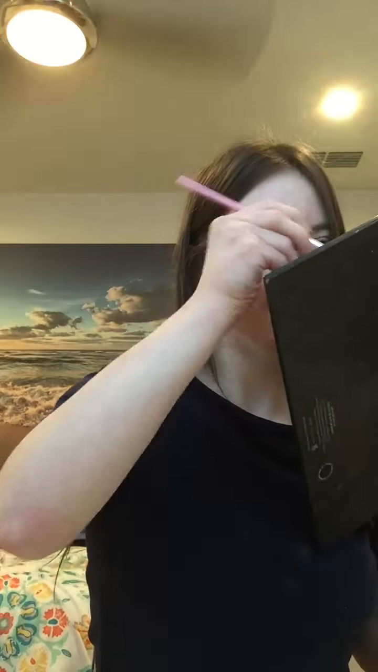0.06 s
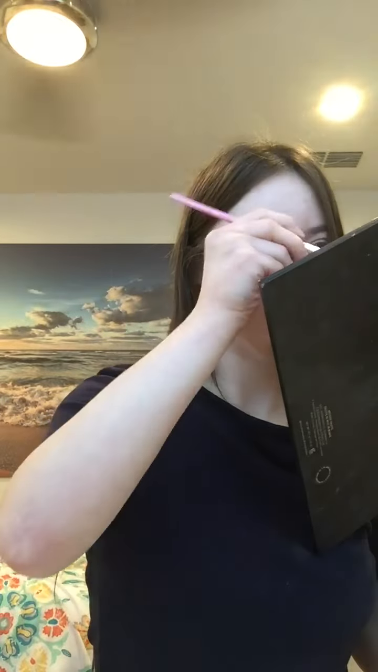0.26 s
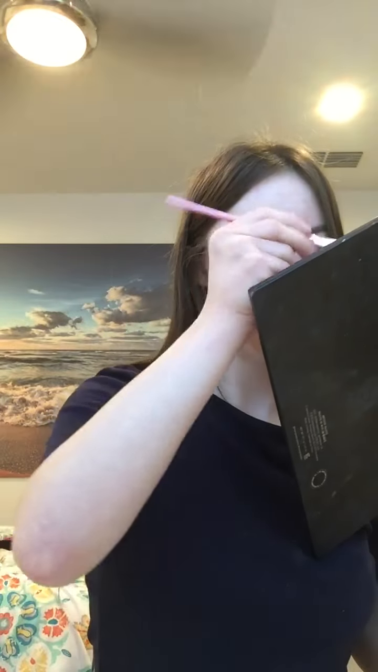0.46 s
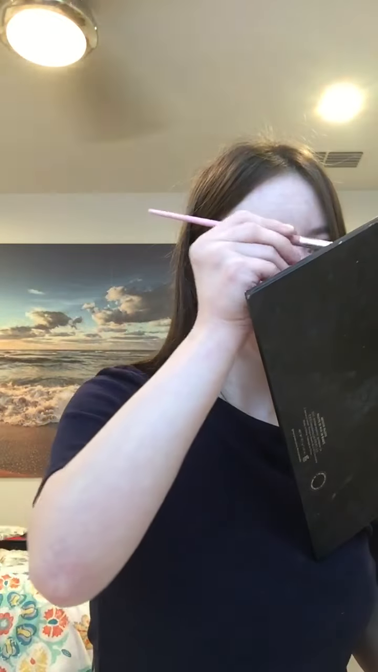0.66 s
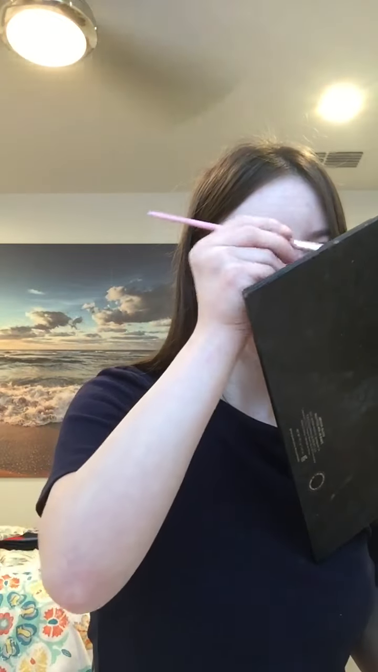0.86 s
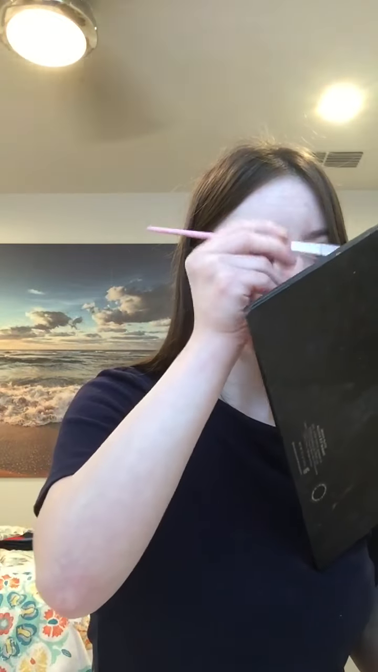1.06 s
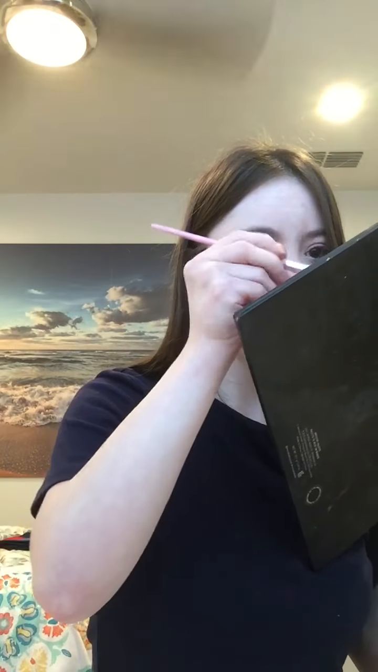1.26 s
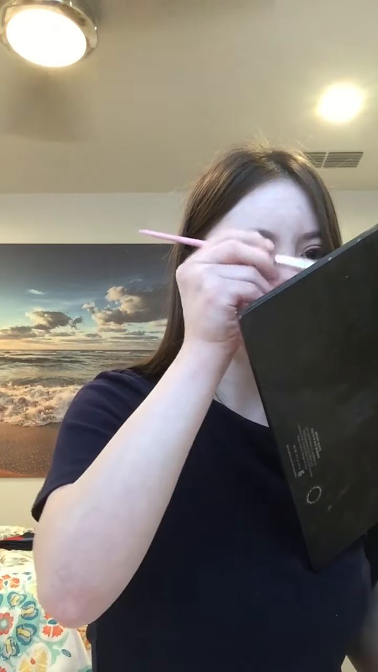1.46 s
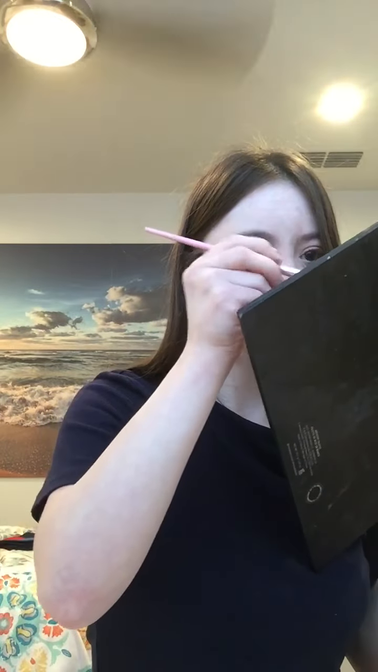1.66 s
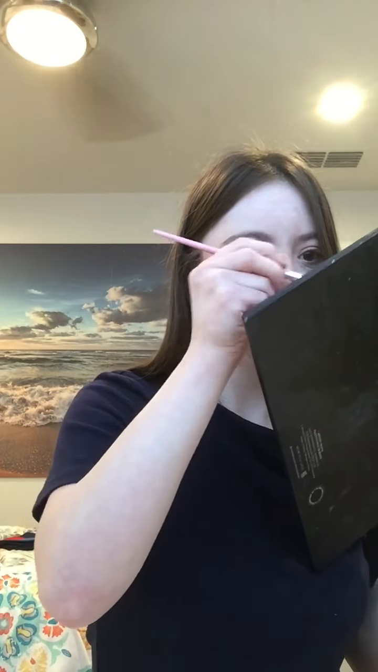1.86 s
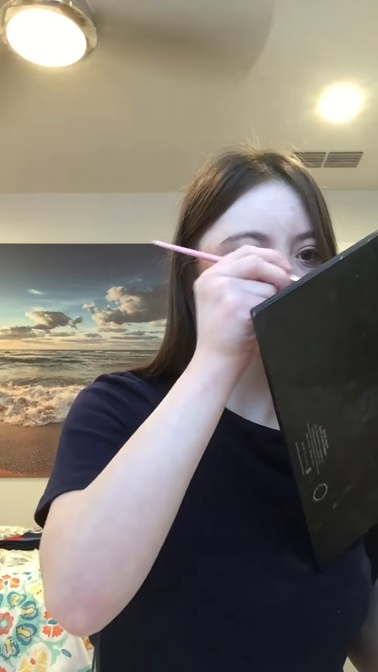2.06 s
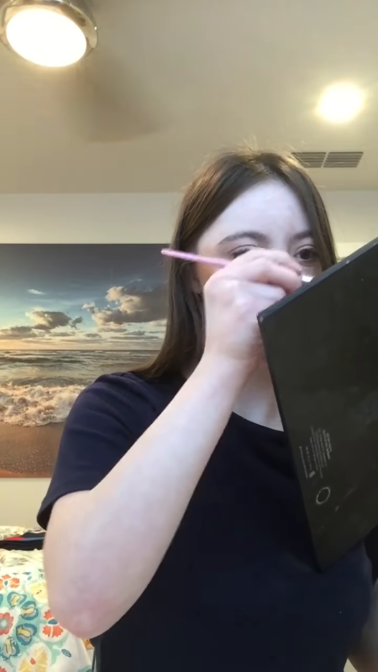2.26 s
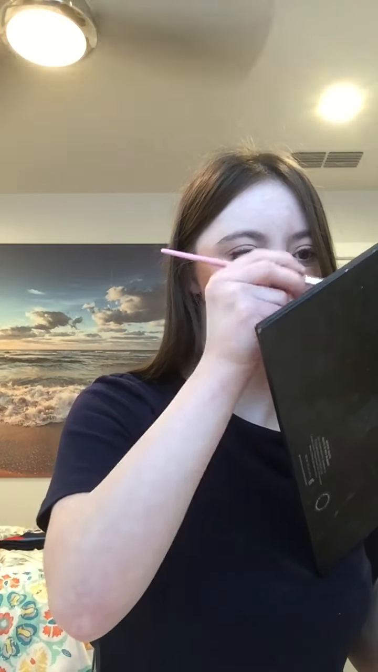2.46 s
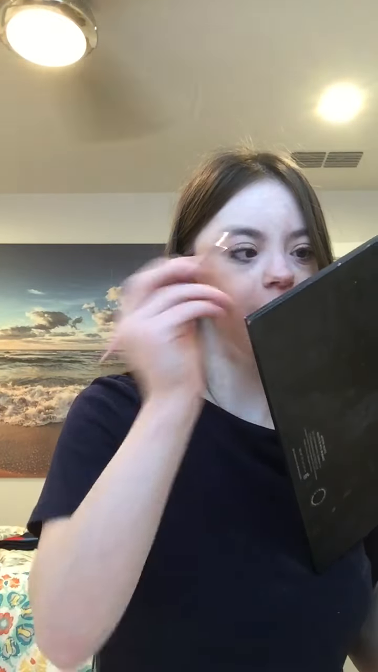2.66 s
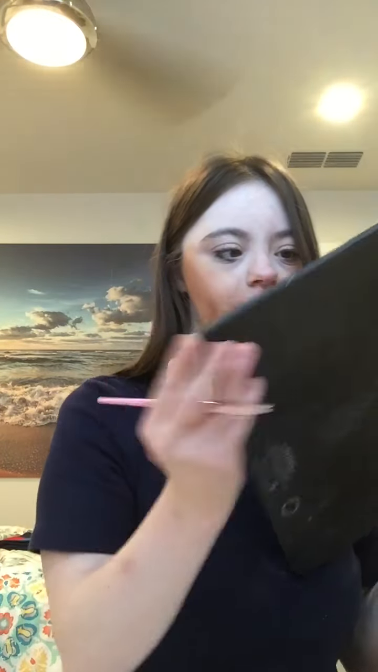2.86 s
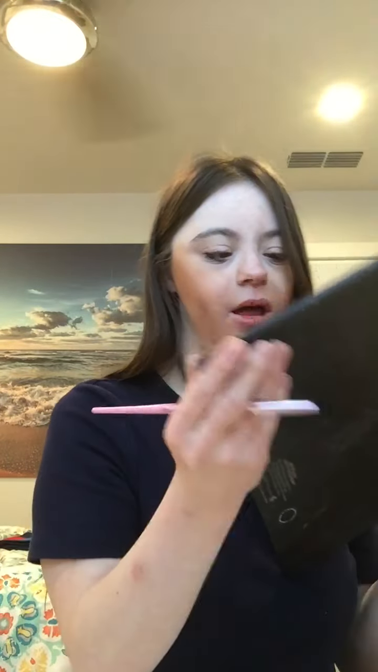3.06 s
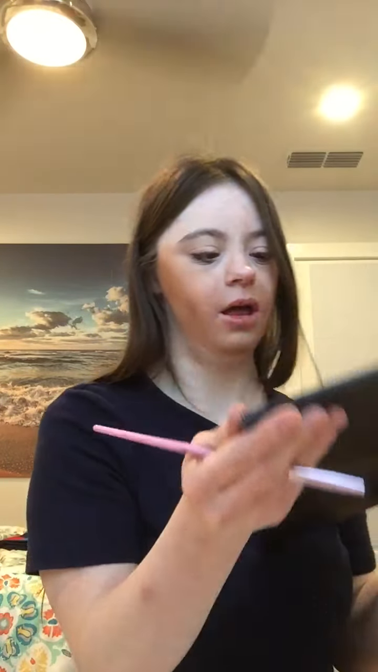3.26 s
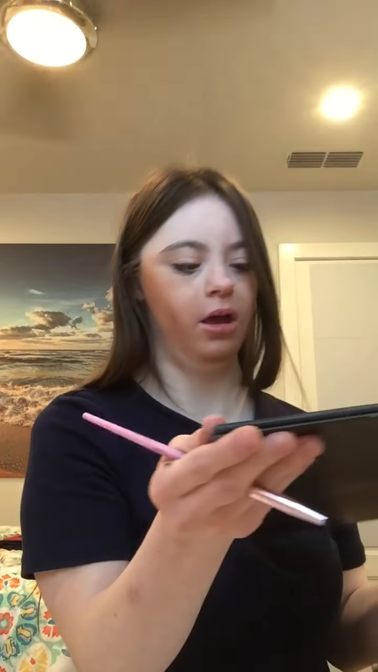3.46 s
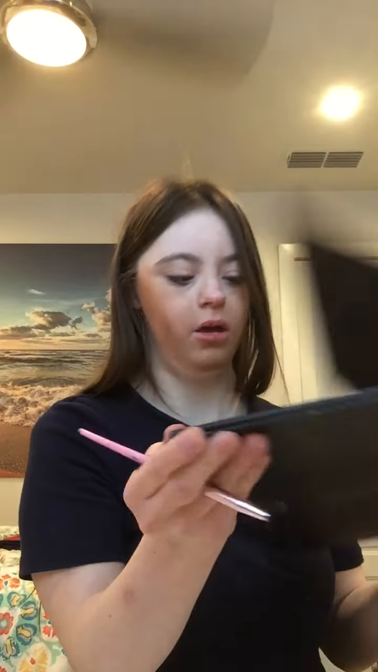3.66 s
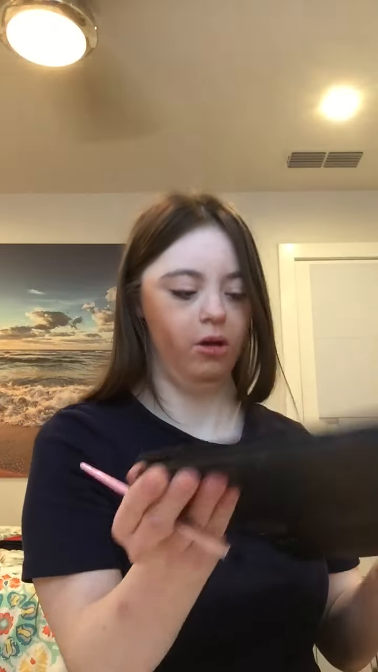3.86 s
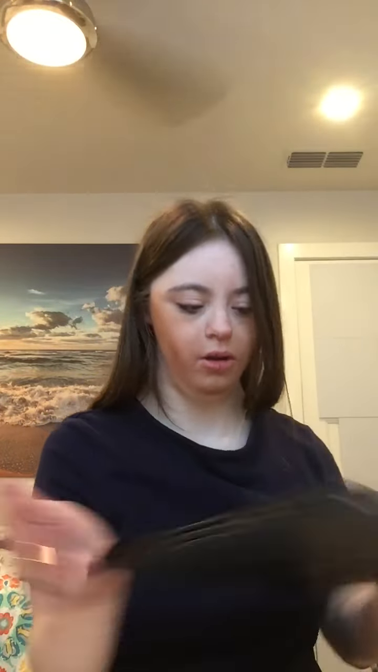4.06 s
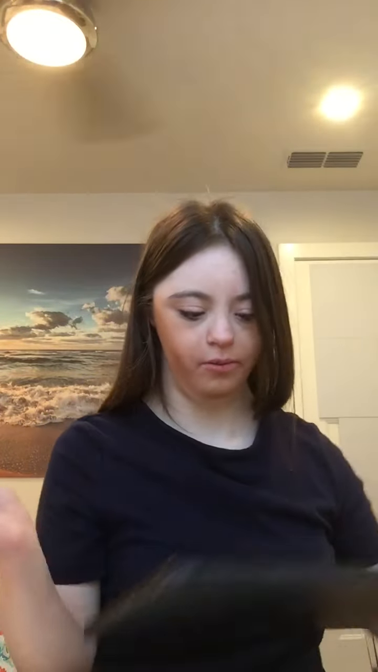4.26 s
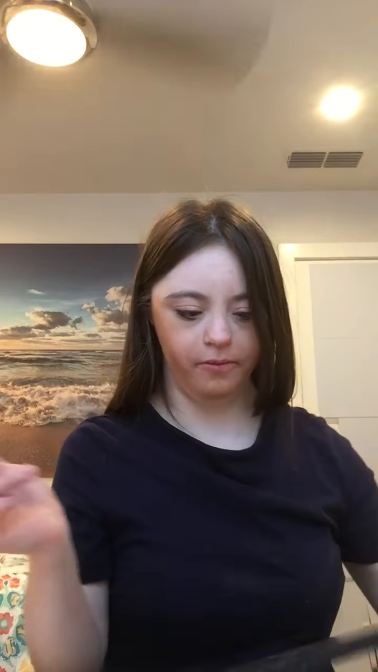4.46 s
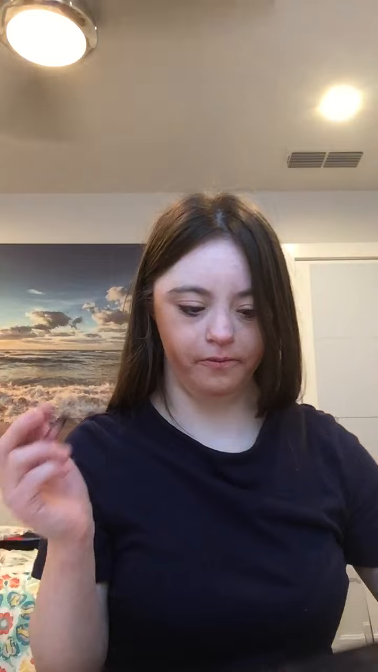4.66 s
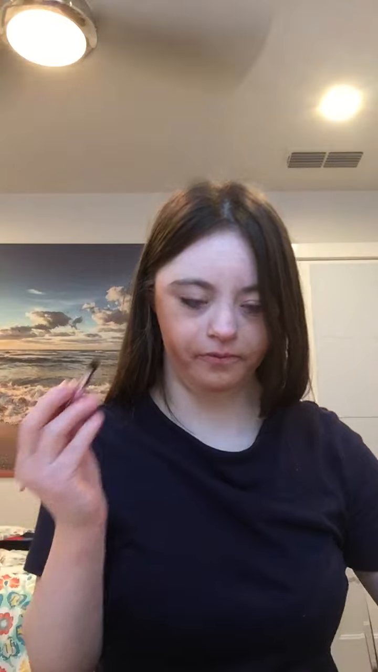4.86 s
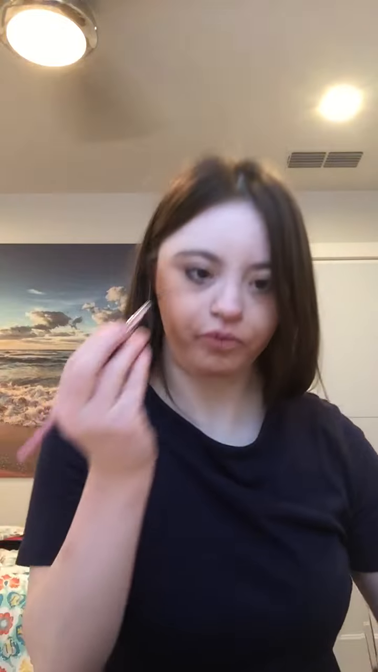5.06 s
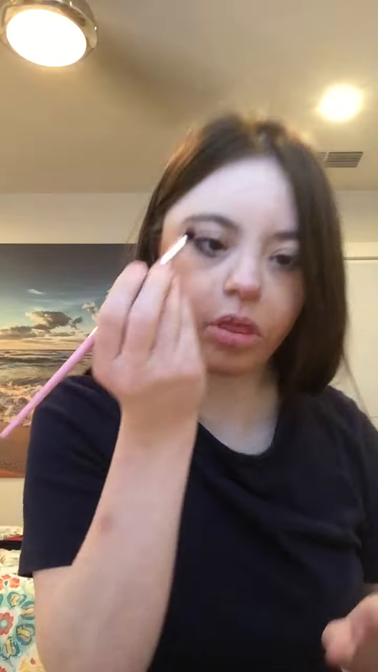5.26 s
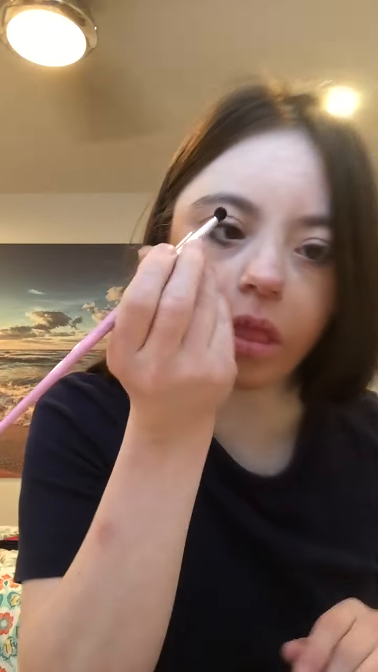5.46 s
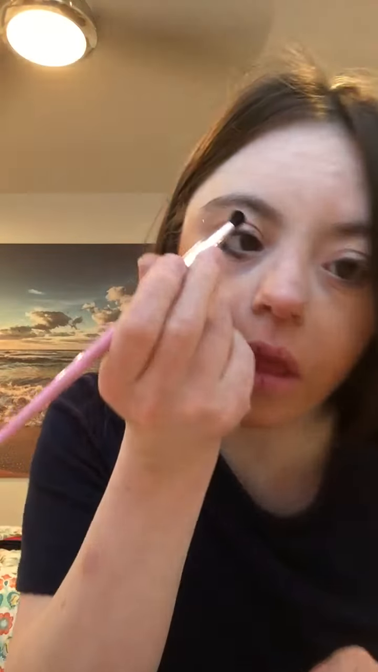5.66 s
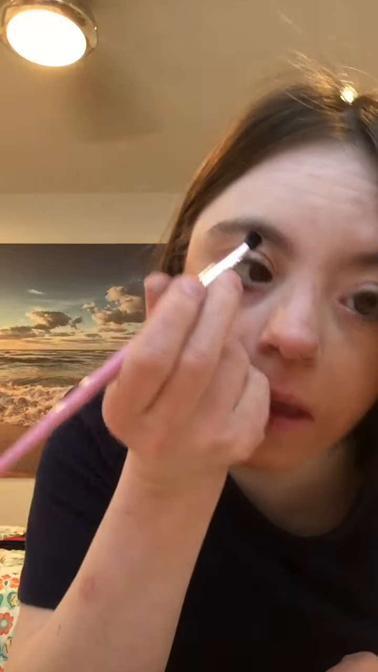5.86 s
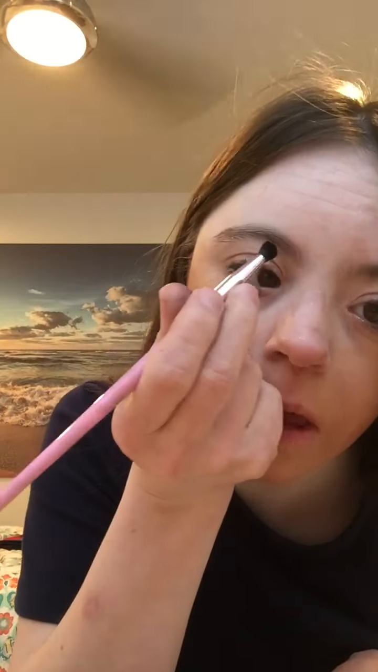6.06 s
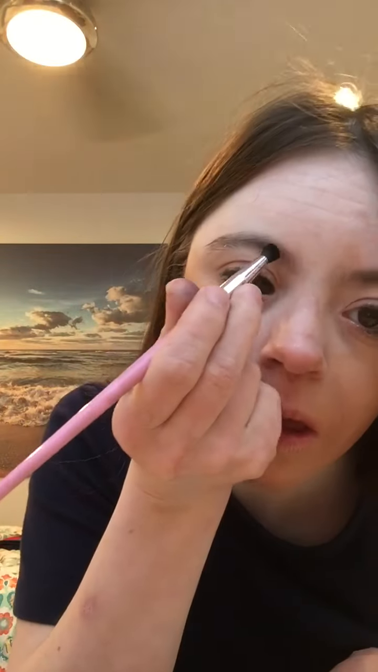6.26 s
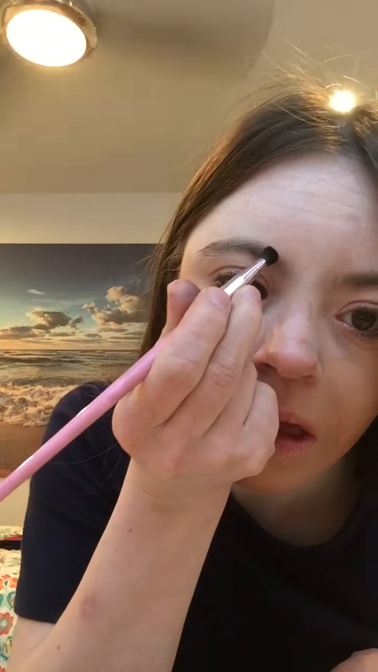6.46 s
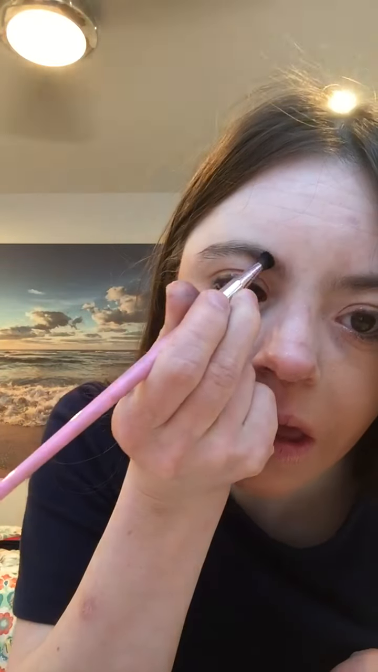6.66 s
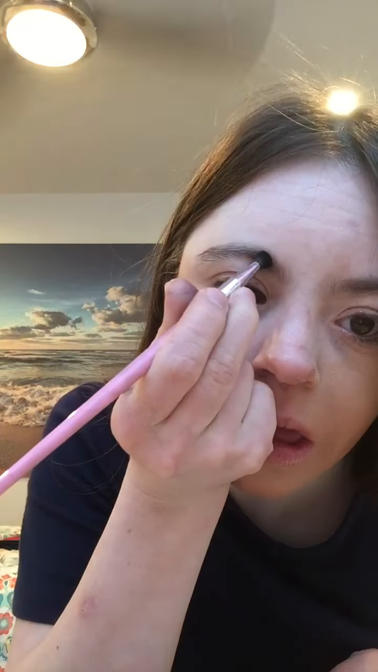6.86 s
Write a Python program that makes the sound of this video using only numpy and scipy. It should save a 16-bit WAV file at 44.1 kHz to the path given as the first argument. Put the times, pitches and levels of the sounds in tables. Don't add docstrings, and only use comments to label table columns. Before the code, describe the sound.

Two sharp plastic lid snaps, then heavy boomy knocks of a case landing on a desk beside the microphone, over faint low hum.

```python
import sys
import numpy as np
from scipy import signal
from scipy.fft import rfft, irfft
from scipy.io import wavfile
from scipy.ndimage import uniform_filter1d

SR = 44100
rng = np.random.default_rng(int(sys.argv[2]) if len(sys.argv) > 2 else 0)


def ratio(d):
    e = np.asarray(d, float) / 20
    return 10 ** e


def pcm_store(signal):
    levels = np.round(np.clip(np.atleast_2d(signal), -1, 1) * 32767)
    wavfile.write(sys.argv[1], SR, levels.astype(np.int16).T)


N = 304376
T = np.arange(N) / SR


def level(x, db):
    return x * ratio(db) / np.sqrt(np.mean(x ** 2))


def high(x, hz):
    return signal.sosfilt(signal.butter(4, hz, "high", fs=SR, output="sos"), x)


def walk(rate_hz):
    k = int(SR / rate_hz)
    x = uniform_filter1d(uniform_filter1d(rng.standard_normal(N), k), k)
    return x / x.std()


def add(out, s, x):
    i = int(s * SR)
    out[i:i + len(x)] += x[:len(out) - i]


def ring(x, modes):
    out = 0
    for k, (hz, width_hz, db) in enumerate(modes):
        out = out + (-1) ** k * ratio(db) * signal.lfilter(*signal.iirpeak(hz, hz / width_hz, fs=SR), x)
    return out


def struck(x, modes):
    out = 0
    for hz, width_hz, db in modes:
        wide_hz = 1.51 * width_hz
        out = out + ring(ring(x, [(hz, wide_hz, db)]), [(hz, wide_hz, 0)])
    return out


def hits(events, modes, crack_hz, lead_db, room_db, wetter=0, blur=1.42):
    lead_ms = 8.1
    dry, send, t = np.zeros(N), np.zeros(N), T[:4096] - .02
    loudest_db = np.max(np.transpose(events)[1])
    noises = rng.standard_normal((len(events), len(t)))
    for (s, db, crack_db, ms, tilt_db), noise in zip(events, noises):
        tilted = np.array([(hz, width_hz, mode_db + tilt_db * np.log2(hz / 1000))
                           for hz, width_hz, mode_db in modes])
        swell = ratio(lead_db) * np.exp(1000 * t / lead_ms)
        shape = np.where(t < 0, swell, np.exp(-1000 * t / max(ms, .2)))
        spectrum = rfft(noise * shape)
        rattle = irfft(spectrum / np.abs(spectrum)) * shape ** 0.29
        click = 1. * (np.arange(len(t)) == np.argmax(shape))
        heard = []
        for contact, wide in ((rattle, 1), (click, blur)):
            body = struck(contact, tilted * [1, wide, 1])
            crack = high(contact, crack_hz)
            heard.append(body / np.linalg.norm(body) + ratio(crack_db) * crack / np.linalg.norm(crack))
        gain = ratio(db) / np.abs(heard[0]).max()
        add(dry, s + t[0], gain * heard[0])
        add(send, s + t[0], gain * ratio(room_db + wetter * (loudest_db - db)) * heard[1])
    return np.array([dry, send])


def rubbed(modes, grit_db, patchy_db):
    size = ratio(grit_db * rng.exponential(size=N) + 0.95 * walk(120))
    grains = sum(ring(size * rng.standard_normal(N), [mode]) * ratio(patchy_db * walk(45)) for mode in modes)
    return level(grains, 0)


def played(sound, strokes, peaks_db):
    power = 0
    for (s, rise_ms, fall_ms, *_), peak_db in zip(strokes, peaks_db):
        away = np.where(T < s, (s - T) / max(rise_ms, 1), (T - s) / max(fall_ms, 1))
        power = power + ratio(2 * peak_db - 21000.0 * away)
    return sound * np.sqrt(power)


# band in Hz, T60 in s.
ROOM_T60 = [(100, 0.34), (1000, 0.29), (4000, 0.18), (12000, 0.19)]


def room():
    wall_ms, wall_db = 19, -10.5
    t = T[:SR // 2]
    hz, t60_s = np.transpose(ROOM_T60)
    tail = 0
    for f in 90 * 2 ** np.arange(0, 7.6, .5):
        band = ring(rng.standard_normal(len(t)), [(f, f / 1.32, 0)])
        tail = tail + band * ratio(-60 * t / np.interp(np.log(f), np.log(hz), t60_s))
    late = np.clip(t - wall_ms / 1000, 0, None)
    wall = ratio(wall_db) * (late > 0) * np.exp(-late / 0.0068)
    tail = tail * (np.clip(t / 0.0079, 0, 1) + wall)
    return tail / np.sqrt(np.sum(tail ** 2))


# frequency in Hz, rms level in dB.
HUM = [(120, -48), (240, -60.5), (360, -60)]
# frequency in Hz, density in dB per Hz.
AIR = [(15, -67), (25, -23.5), (65, -13), (92, -9), (124, -10), (146, -10.5), (167, -10.5), (232, -9),
       (296, -14.5), (358, -12.5), (510, -31), (634, -31), (13300, -52), (15200, -49), (16500, -66)]


def fan():
    air_db = -54
    hum = 0
    for (hz, db), waver_db in zip(HUM, (.9, 2.5, 2.5)):
        phase = 2 * np.pi * hz * T + 0.24 * walk(5.9) + rng.uniform(0, 2 * np.pi)
        hum = hum + np.sqrt(2) * ratio(db + waver_db * walk(6.3)) * np.sin(phase)
    hz, db = np.transpose(AIR)
    f = np.maximum(np.fft.rfftfreq(N, 1 / SR), 1)
    density = ratio(np.interp(np.log(f), np.log(hz), db))
    air = irfft(rfft(rng.standard_normal(N)) * density, N)
    return hum + level(air * ratio(0.29 * walk(1)), air_db)


# peak in seconds, rise and fall in ms per 10 dB, level in dB.
SLEEVE = [
    (5.36, 65, 30, -67),
    (5.37, 7, 6, -56),
    (5.52, 12, 60, -66),
    (5.575, 104, 47, -57.5),
]


def sleeve():
    cloth = rubbed([(685, 170, 2.5), (1400, 450, -5.0)], grit_db=2.5, patchy_db=3.5)
    return played(cloth, SLEEVE, np.transpose(SLEEVE)[-1])


# peak in seconds, rise and fall in ms per 10 dB, level in dB.
CREAK = [
    (3.035, 22, 68, -56),
    (3.092, 12, 11, -53.5),
    (3.165, 90, 27, -60),
]


def hinge():
    creak = rubbed([(2030, 130, 1), (2210, 120, 0)], grit_db=2.5, patchy_db=5.0)
    return played(creak, CREAK, np.transpose(CREAK)[-1])


# peak in seconds, rise and fall in ms per 10 dB, dry skin in dB, dull scrape in dB.
RUBS = [(1.07, 60, 80, -74, -73.5), (1.165, 10, 30, -74, -73), (1.605, 42, 40, -75, -76),
        (2.064, 8, 22, -76, -57), (2.112, 5, 50, -70, -70), (2.786, 18, 127, -58.5, -59.5),
        (2.94, 60, 30, -63, -66), (3.011, 30, 45, -54.5, -61), (3.097, 19, 32, -56, -61),
        (3.177, 60, 45, -65.5, -68), (3.329, 21, 22, -65, -77), (3.383, 35, 77, -66, -67),
        (3.64, 48, 150, -58.5, -64), (3.73, 130, 40, -55, -72), (3.96, 22, 97, -62.5, -57.5),
        (4.062, 25, 32, -58.5, -65), (4.152, 54, 41, -56.5, -66), (4.71, 35, 40, -67, -51.5),
        (4.78, 45, 150, -64.5, -60.5), (4.846, 25, 11, -62, -54), (4.9, 40, 150, -88, -69),
        (4.986, 8, 60, -70, -56), (5.02, 57, 45, -66, -61), (5.565, 52, 45, -68, -60.5)]
# centre in Hz, width in Hz, level in dB.
SKIN = [(6500, 4500, -11.5), (9060, 1500, -5.5), (12400, 1800, -1), (14800, 2400, -0.5)]
# centre in Hz, width in Hz, level in dB.
SCRAPE = [(910, 1100, 2), (1940, 1050, -0.5), (3170, 800, -6.5), (4100, 1100, 2.5), (5130, 690, 0.5)]


def fingers():
    skin = rubbed(SKIN, grit_db=2.2, patchy_db=2.6)
    scrape = rubbed(SCRAPE, grit_db=2.2, patchy_db=2.8)
    *_, skin_db, scrape_db = np.transpose(RUBS)
    return played(skin, RUBS, skin_db) + played(scrape, RUBS, scrape_db)


# start in seconds, peak in dB, mode in Hz, contact in ms.
PINGS = [
    (2.939, -45, 1400, 1.3),
    (3.776, -51, 4260, 6.5),
    (4.9133, -49, 3050, 1.5),
    (5.047, -47, 3430, 1.8),
    (5.37, -48, 1400, 1.6),
    (5.66, -53.5, 8300, 2.9),
    (5.986, -54.5, 7100, 2.4),
]


def pings():
    width_share = 0.13
    return sum(hits([(s, db, -60, ms, 0)], [(hz, width_share * hz, 0)], crack_hz=8000, lead_db=-29, room_db=-19)
               for s, db, hz, ms in PINGS)


# start in seconds, peak in dB, treble crack in dB, contact in ms, tilt in dB per octave.
TICKS = [(2.058, -51, -23, 3.7, -5), (2.075, -53, -14, 3.2, 3), (2.10, -65, 0, 2.2, .3),
         (2.776, -47, -15, 1.7, -11), (4.056, -58, -10, 1.9, .3), (4.706, -48, -20, 5.1, -7),
         (4.986, -47, -32, 3.7, -11), (5.01, -56, -25, 3.4, -6), (5.047, -46, -30, 2.6, -10),
         (5.499, -62, 5, 1.5, .3), (5.647, -53, 8, 1.5, .3), (5.72, -57, 5, 1.5, .3),
         (6.0, -56, 7, 2.2, .3)]
# frequency in Hz, width in Hz, level in dB.
BRUSH = [(2380, 790, -12), (3520, 920, -1), (5600, 680, -6), (7100, 2900, -13)]


def ticks():
    return hits(TICKS, BRUSH, crack_hz=7600.3, lead_db=-4, room_db=-6)


# start in seconds, peak in dB, treble crack in dB, contact in ms, tilt in dB per octave.
TAP = [
    (6.228, -32, -11.5, 1.3, .3),
    (6.251, -39.5, -14.5, 6.3, .3),
]
# frequency in Hz, width in Hz, level in dB.
HANDLE = [(1030, 200, -20), (1490, 410, 6.5), (1915, 47, 6), (3050, 400, -36), (3950, 370, 1.5),
          (5950, 470, -9.5)]


def handle_tap():
    return hits(TAP, HANDLE, crack_hz=7000, lead_db=-19, room_db=-4, blur=1)


def desk(blows, choke, sag_per_db):
    sag_from_db, least_sag = -41, 0.25
    deep_hz, deep_ms = 69.7, 21.7
    out, t = np.zeros(N), T[:8192]
    for s, db, hz, ms, deep_db in blows:
        sag = max(least_sag, sag_per_db * (db - sag_from_db))
        phase = 2 * np.pi * hz * (t + sag * 0.0024 * (1 - np.exp(-t / 0.0018)))
        top = np.sin(phase) * (1 - np.exp(-t / 0.00094)) * np.exp(-(1000 * t / ms) ** choke)
        deep_shape = (1 - np.exp(-t / 0.0048)) * np.exp(-1000 * t / deep_ms)
        deep = ratio(deep_db) * np.sin(2 * np.pi * deep_hz * t) * deep_shape
        add(out, s, ratio(db) * (top - deep))
    return out


# start in seconds, peak in dB, ring in Hz, lasts in ms, deep mode in dB.
SLAPS = [
    (5.034, -26.5, 96, 14, 3),
    (5.0908, -3.5, 117, 15.4, -19),
]


def slaps():
    slap = -desk(SLAPS, choke=3.4, sag_per_db=0)
    return np.array([slap, ratio(-21.0) * slap])


# start in seconds, peak in dB, ring in Hz, lasts in ms, deep mode in dB.
BOOMS = [
    (2.9285, -39.5, 152, 9.8, -11),
    (2.9385, -32.5, 229, 22, -2),
    (3.7845, -30, 109, 17, -32),
    (3.7905, -24, 210, 6.4, -14),
    (4.4233, -6.5, 126, 11.9, -10),
    (4.5190, -17, 131, 9.5, -9),
    (4.6620, -7, 108, 12.8, -13),
    (4.6896, -13, 98, 7.5, -38.5),
    (4.849, -28.5, 138, 7.8, -9),
    (5.369, -36.5, 140, 9.3, -22),
]


def booms():
    boom = desk(BOOMS, choke=1.1, sag_per_db=.032)
    return np.array([boom, ratio(-13.5) * boom])


# start in seconds, peak in dB, treble crack in dB, contact in ms, tilt in dB per octave.
LANDINGS = [
    (4.4222, -22.5, -24.5, 2.2, -0.56),
    (4.518, -38, -24, 2.6, -1.3),
]
# frequency in Hz, width in Hz, level in dB.
EDGE = [(270, 85, -6.5), (355, 56, 2), (680, 145, 3), (983, 160, -5.5), (1400, 170, -5), (1860, 120, -15),
        (2750, 710, -18), (4400, 1500, -32)]


def landings():
    return hits(LANDINGS, EDGE, crack_hz=4530, lead_db=-33, room_db=-8)


# start in seconds, peak in dB, treble crack in dB, contact in ms, tilt in dB per octave.
KNOCKS = [
    (2.938, -38.5, -29, 3.2, -16),
    (3.061, -48, -34, 4.9, -9),
    (4.6605, -13.5, -28, 3.6, -1.5),
    (4.683, -25, -23, 3, 0.5),
    (4.8465, -35, -23, 2, 1),
    (4.926, -44, -29, 2.7, 0.5),
    (5.091, -9.5, -22, 3.6, -2.6),
    (5.118, -39, -27, 4.3, 0),
    (5.369, -45, -37, 1.5, -14),
]
# frequency in Hz, width in Hz, level in dB.
CASE = [(353, 234, 1), (540, 97, -2.5), (680, 177, 1), (942, 160, -4), (1400, 176, 0), (1920, 250, -4),
        (2390, 340, -20), (2980, 660, -21.5), (3890, 400, -10), (4510, 600, -15.5), (5200, 990, -41)]


def knocks():
    return hits(KNOCKS, CASE, crack_hz=4960, lead_db=-35, room_db=-10, wetter=0.1926)


# start in seconds, peak in dB, treble crack in dB, contact in ms, tilt in dB per octave.
CLACKS = [
    (3.7875, -15, -11.5, 3, -.2),
    (3.897, -13, -8, 4.5, 0.45),
    (3.84, -38, -3, 21, -3),
]
# frequency in Hz, width in Hz, level in dB.
LID = [(327, 227, -2.5), (595, 165, -0.5), (1003, 240, -1.5), (1327, 160, -1), (1634, 140, -2.5),
       (1990, 200, -1), (2429, 300, -4.5), (2826, 290, -9), (3302, 180, -3.5), (3770, 220, -5.5),
       (4270, 270, -8), (5100, 650, -14.5), (6100, 1600, -28.5)]


def clacks():
    return hits(CLACKS, LID, crack_hz=5000, lead_db=-37, room_db=-3.5)


def scene():
    background = fan() + sleeve() + hinge() + fingers()
    small = pings() + ticks() + handle_tap()
    dry, send = small + slaps() + booms() + landings() + knocks() + clacks()
    wet = signal.fftconvolve(send, room())[:N]
    return (background + dry + wet)[None]


def band_limit(x):
    return signal.sosfilt(signal.butter(12, 16970, fs=SR, output="sos"), x)


def record(dry):
    heard = signal.lfilter(*signal.butter(2, 40, "high", fs=SR), dry)
    heard = signal.sosfilt(signal.ellip(8, .2, 30, 15900, fs=SR, output="sos"), heard)
    return band_limit(heard)


dry = scene()
out = record(dry)
pcm_store(out)
```